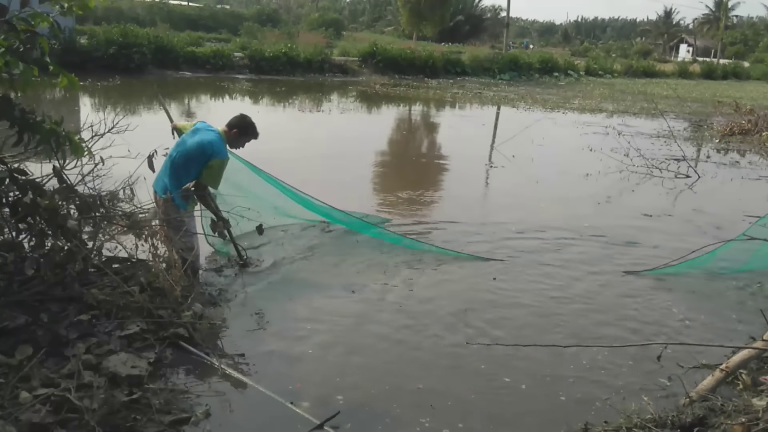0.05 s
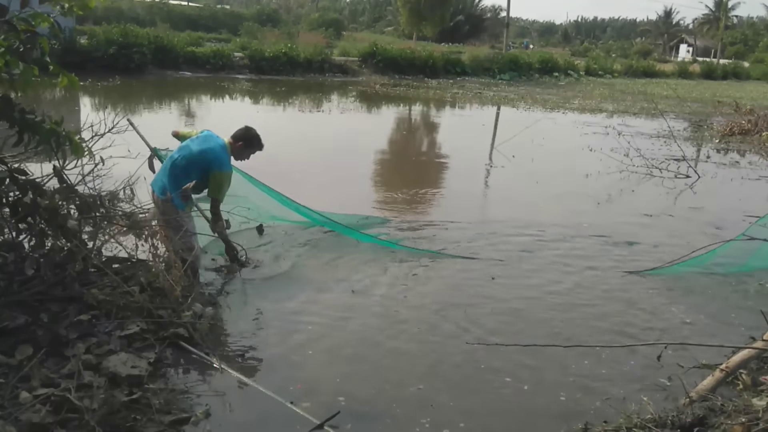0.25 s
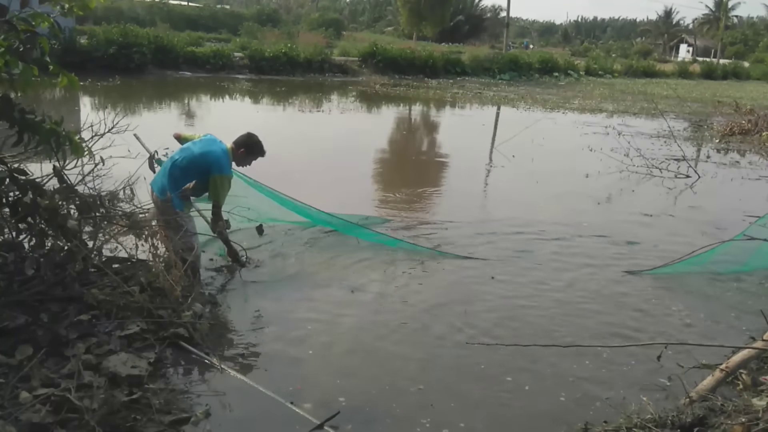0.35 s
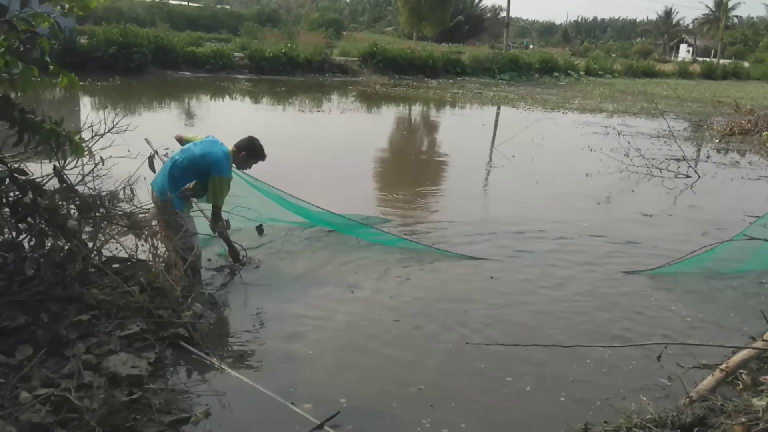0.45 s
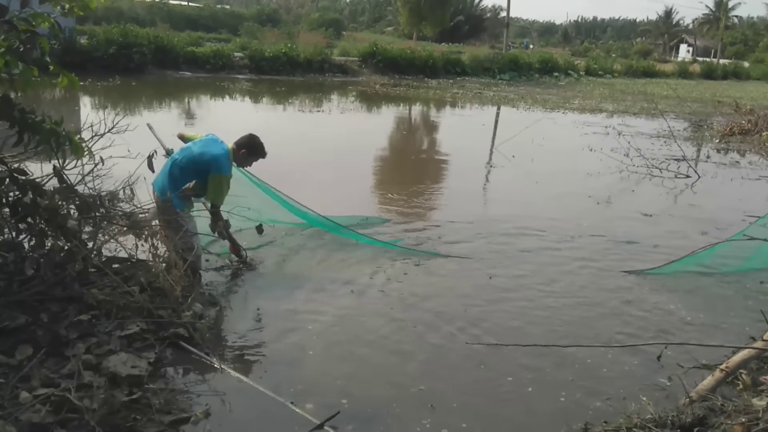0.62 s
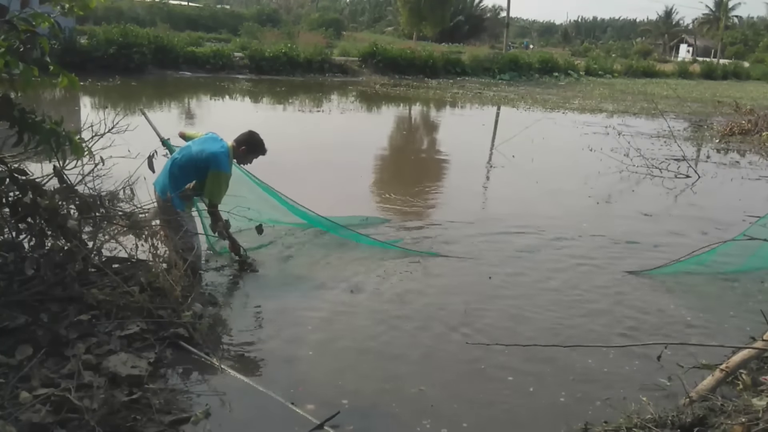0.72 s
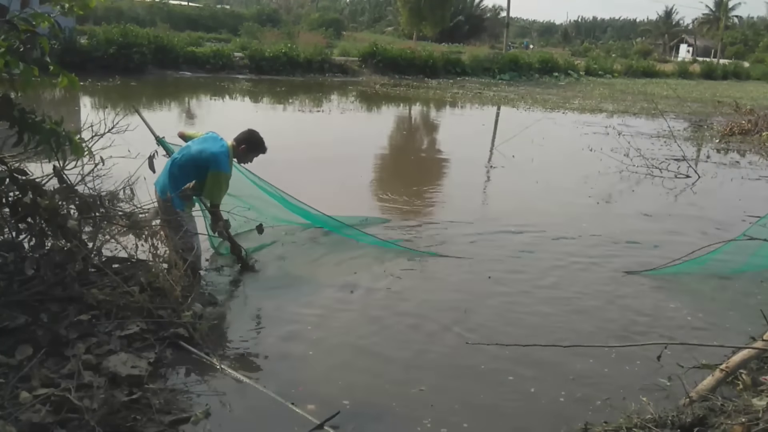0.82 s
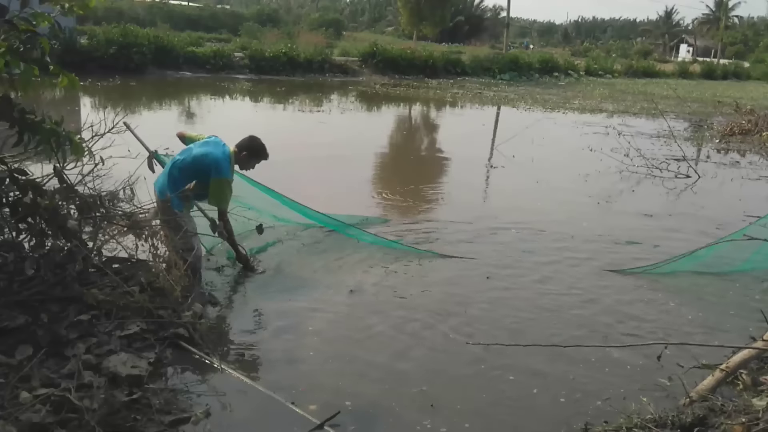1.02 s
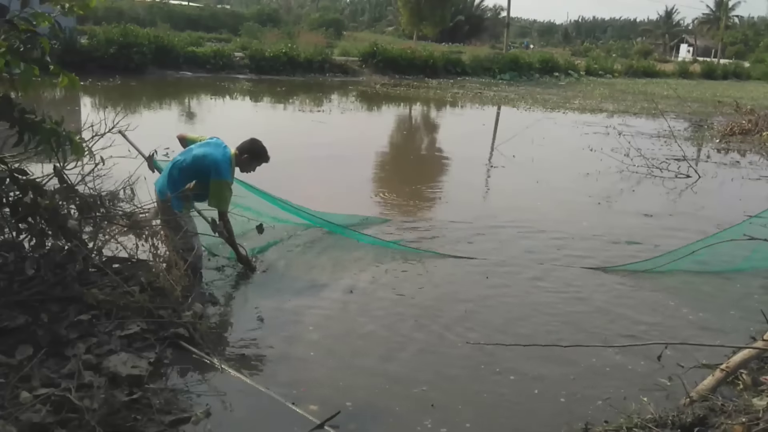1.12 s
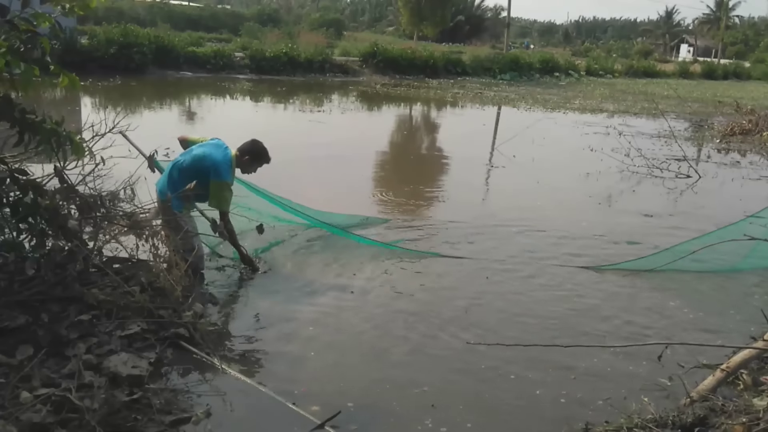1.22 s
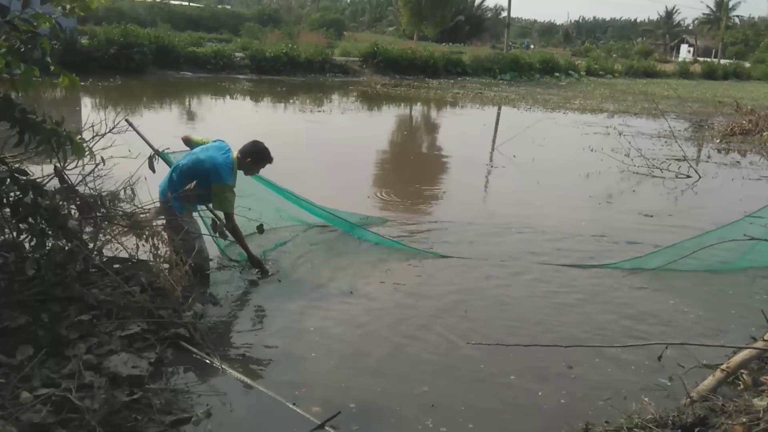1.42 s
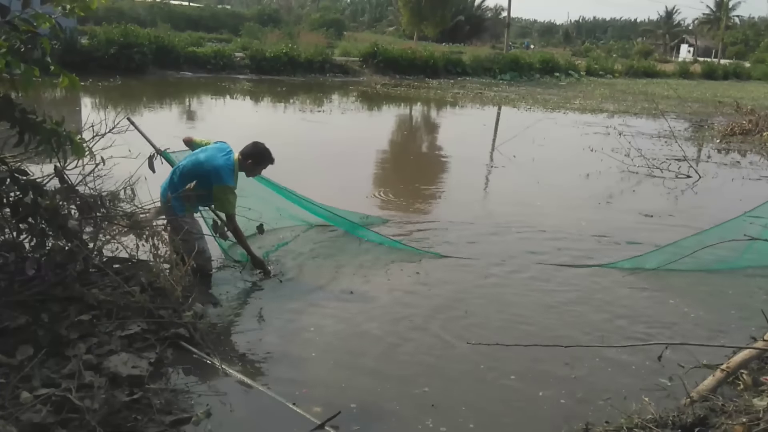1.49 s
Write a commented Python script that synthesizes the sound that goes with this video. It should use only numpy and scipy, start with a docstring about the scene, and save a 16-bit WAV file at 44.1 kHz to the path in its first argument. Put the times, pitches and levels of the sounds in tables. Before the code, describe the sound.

Water splashing as a fine-mesh net slaps a pond surface, then swishes through the shallows

```python
"""Net dragged through a pond

Someone works a fine-mesh net in the shallows. A sharp slap throws up spray, then the net is dragged in a
longer swish, and single drops snap over a quiet outdoor background. Streaming water and spray are filtered
noise crackles, slaps and drops are short decaying bursts, and bubbles are fading tones that rise in pitch.
"""
import sys
import numpy as np
from scipy import signal
from scipy.fft import rfft, irfft
from scipy.io import wavfile

SR = 44100
rng = np.random.default_rng(int(sys.argv[2]) if len(sys.argv) > 2 else 0)


def pcm_store(signal):
    """Save signal as 16-bit PCM."""
    levels = np.round(np.clip(np.atleast_2d(signal), -1, 1) * 32767)
    wavfile.write(sys.argv[1], SR, levels.astype(np.int16).T)


N = 68355
T = np.arange(N) / SR  # time of each sample, in seconds

# Quiet open air, tone colour: (frequency [Hz], relative level [dB])
AIR_COLOUR = [(18, -51), (30, 6), (124, -12.5), (300, -5), (801, -12.5), (1210, -9.5), (1930, -14),
              (2080, -10), (4770, -17.5), (13400, -19.5), (14500, -16)]
AIR_DB = -65
# Deep rumble, loudness over time: (time [s], level [dB])
RUMBLE_LEVEL = [(0, -88), (0.12, -70), (0.25, -61.5), (0.325, -60), (0.42, -68), (0.55, -73), (0.69, -68),
                (0.88, -61), (0.97, -65), (1.08, -63), (1.28, -70), (1.55, -78)]
# Deep rumble, tone colour: (frequency [Hz], relative level [dB])
RUMBLE_TONE = [(25, -4), (42, -12), (60, 4.5), (120, -5.5), (200, 2), (500, -54)]
# Water pushed about by the net: (time [s], level [dB])
SLOSH_LEVEL = [(0, -71.5), (0.16, -59.5), (0.3, -57.5), (0.43, -58.5), (0.55, -70.5), (0.65, -63.5),
               (0.71, -61.5), (0.77, -59.5), (0.88, -55.5), (1.15, -55), (1.33, -59), (1.55, -56.5)]
# Pushed water, tone colour: (frequency [Hz], relative level [dB])
SLOSH_TONE = [(50, -19), (100, -1), (250, -2.5), (450, -1.5), (800, -5), (1500, -8.5), (3000, -12.5),
              (6000, -46)]
# Gurgling bubbles: how many, how long they ring, level against the churn
GURGLES_PER_S, GURGLE_CYCLES, GURGLE_DB = 420, 4.4, -5.5
BUBBLE_RISE_PER_LIFE = 0.061  # share of the starting pitch

# Water streaming through the mesh in the first pull: (time [s], level before MESH_DB [dB])
FIRST_PULL_LEVEL = [(0.0, -74), (0.07, -73.5), (0.11, -58.5), (0.164, -50), (0.19, -48.5), (0.39, -55.5),
                    (0.43, -51), (0.48, -57.5), (0.53, -94), (0.6, -78)]
# Water streaming through the mesh in the second pull: (time [s], level before MESH_DB [dB])
SECOND_PULL_LEVEL = [(0.61, -78), (0.66, -59), (0.71, -54), (0.768, -51.5), (0.8, -43.5), (0.84, -41.5),
                     (0.99, -42), (1.04, -45), (1.18, -48.5), (1.275, -48.5), (1.31, -59.5), (1.55, -58.5)]
# Mesh water, tone colour: (frequency [Hz], relative level [dB])
MESH_COLOUR = [(500, -9.5), (1000, -11.5), (1800, -6), (2600, -4.5), (3800, -1.5), (5200, -3.5), (6500, -1),
               (8500, 1.5), (11000, -1), (14000, -7)]
MESH_DB, MESH_LOW_HZ, MESH_SCATTER_DB = 3.5, 910, 3.5
FIZZ_PER_S, FIZZ_CYCLES, FIZZ_DB = 900, 50, -11  # tiny bubbles in the mesh, level against the hiss
DROPLETS_PER_S, MIST_DB = 5100, 4  # mist level is set against the droplets

# Hollow body of a splash: (time [s], level [dB], decay time constant [s])
PLOP_HITS = [(0.2005, -45, 0.031), (1.4245, -58, .003), (1.432, -53.5, 0.02), (0.95, -64, .01)]
PLOP_HZ, PLOP_WIDTH_HZ = 1130, 800
# Spray thrown up or falling back: (start [s], level [dB], attack [s], hold [s], decay [dB per s])
SPRAY_BURSTS = [(0.201, -30, 0.0094, 0.042, 184), (0.268, -42.5, 0.032, 0.021, 114),
                (0.418, -50, 0.0047, 0.0033, 500), (1.198, -40.5, 0.01, 0.0048, 271),
                (1.252, -47.5, 0.011, 0.0029, 427), (1.429, -51, 0.0048, .004, 250)]
# Spray, tone colour: (frequency [Hz], relative level [dB])
SPRAY_COLOUR = [(500, -12), (1100, -11), (1750, -10), (2700, -1.5), (4000, 0.5), (5000, -2.5), (6400, 0),
                (8500, 1), (11000, -1.5), (14000, -8)]
SPRAY_SCATTER_DB = 3.5
# Slaps of the wet net on the water: (time [s], level [dB], decay time constant [s])
SLAP_HITS = [(0.2113, -22, .0005), (0.2125, -11.5, 0.001), (0.2142, -21, 0.0025), (0.2170, -17.5, 0.0018)]
# Slaps, tone colour: (frequency [Hz], relative level [dB])
SLAP_COLOUR = [(400, -19), (800, -20), (1500, -20), (2200, -9), (2900, 0.5), (3600, -16), (4400, -3.5),
               (5300, -2.5), (6300, 2), (7700, 6), (9200, -5), (10500, -8), (12200, -11), (13100, 0),
               (14500, -15)]
# Air pockets that ring after a slap: (pitch [Hz], level [dB], time to fall by 60 dB [s])
AIR_POCKETS = [(2750, -38, 0.086), (3010, -28.5, 0.083), (4570, -34, 0.089), (6140, -37, .08)]
# Single drops: (time [s], level [dB], decay time constant [s])
DRIP_HITS = [(0.4258, -30, 0.00066), (0.4965, -38, 0.0013), (0.619, -52, .001), (0.6235, -41, 0.0017),
             (0.629, -45, .002), (0.673, -51, .001)]
# Drops, tone colour: (frequency [Hz], relative level [dB])
DRIP_COLOUR = [(200, -18), (1200, -12), (3000, 4), (5000, -3), (7300, 11), (10000, 5), (14500, -6)]
# Single bubbles that stand out, low and high: (time [s], starting pitch [Hz], level [dB], decay time constant [s])
SINGLE_BUBBLES = [(0.695, 405, -52.5, 0.012), (0.718, 240, -53, 0.018), (0.966, 1595, -46, 0.008),
                  (1.229, 860, -51, .008), (1.262, 7820, -38, 0.0076), (1.4335, 1340, -47, .002)]
GLUG_RISE_PER_S = 2.7  # share of the starting pitch
# One sharp snap of the net: (time [s], level [dB], decay time constant [s])
SNAP_HIT = [(1.4249, -24.5, 0.0009)]
# Snap, tone colour: (frequency [Hz], relative level [dB])
SNAP_TONE = [(200, -9), (700, -14), (1250, -0.5), (2200, -7.5), (3700, -2.5), (5000, -11), (7000, 8.5),
             (8400, -4), (9500, 4), (11000, -5), (14500, -3)]
SPIKE_DB = 10  # first contact, over the crack that follows
BANK_DB, BANK_DECAY_S = -9.5, 0.013

# Two microphones: delay at the right one, then how much sound arrives scattered in bass and treble
RIGHT_LAG_S, DIFFUSE_HZ, BASS_SHARE, DIFFUSE_SHARE = 0.000062, 477, 0.076, 0.82
SPLASH_RIGHT_DB, SLOSH_RIGHT_DB = 2, 0.6  # right microphone over left
TOP_HZ = 14400


def undb(db):
    """Turn decibels into a plain multiplier."""
    return 10 ** (np.asarray(db) / 20)


def unit(x):
    """Scale to an average (rms) strength of 1."""
    return x / np.sqrt(np.mean(x ** 2))


def curve(rows):
    """Loudness that follows (s, dB) points, silent beyond 30 ms outside them."""
    s, db = np.array(rows).T
    active = (T >= s[0] - 0.03) * (T <= s[-1] + 0.03)
    return undb(np.interp(T, s, db)) * active


def colour(x, points):
    """Filter through (Hz, dB) points without sounding early, keeping the power of white noise."""
    hz, db = np.array(points).T
    size = 8192
    f = np.maximum(np.fft.rfftfreq(size, 1 / SR), 1)
    gain = undb(np.interp(np.log(f), np.log(hz), db))
    # Fold the cepstrum forward in time: a minimum-phase filter
    cepstrum = irfft(np.log(gain))
    cepstrum[1:size // 2] *= 2
    cepstrum[size // 2 + 1:] = 0
    response = irfft(np.exp(rfft(cepstrum)))
    response = response / np.linalg.norm(response)
    return signal.fftconvolve(x, response[None], axes=1)[:, :N]


def high_pass(x, hz):
    """Remove the lows."""
    return signal.sosfilt(signal.butter(2, hz, "high", fs=SR, output="sos"), x)


def ports(x, share):
    """Three like signals to two microphones: one direct, later at the right; two scattered, mostly treble."""
    f = np.fft.rfftfreq(N, 1 / SR)
    spectra = rfft(x)
    treble = f ** 2 / (f ** 2 + DIFFUSE_HZ ** 2)
    scattered = np.clip(BASS_SHARE + (share - BASS_SHARE) * treble, 0, 1)
    delay = np.exp(-2j * np.pi * f * RIGHT_LAG_S)
    direct = np.array([spectra[0], spectra[0] * delay])
    return irfft(np.sqrt(1 - scattered) * direct + np.sqrt(scattered) * spectra[1:], N)


def pan(x, right_db):
    """Make the right louder than the left by right_db."""
    return x * undb(np.array([[-right_db], [right_db]]) / 2)


def noise():
    """Steady noise at both microphones."""
    return ports(rng.standard_normal((3, N)), DIFFUSE_SHARE)


def droplets(scatter_db):
    """Thousands of tiny impacts of uneven size, each a very short crackle, over a fine mist."""
    landed = rng.random(N) < DROPLETS_PER_S / SR
    size = np.minimum(rng.exponential(size=N), 5)
    hits = landed * undb(scatter_db * size)
    # The power of each crackle dies away with a time constant of 0.25 ms
    power = signal.lfilter([1], [1, -np.exp(-1 / (SR * 0.00025))], hits ** 2)
    strength = np.sqrt(power / power.mean() + undb(MIST_DB) ** 2)
    return unit(ports(rng.standard_normal((3, N)) * strength, DIFFUSE_SHARE))


def bursts(rows, share):
    """Each impact is one pressure spike and a crack that dies away exponentially."""
    power, spikes = 0, np.zeros((3, N))
    for s, db, tau in rows:
        power = power + undb(db) ** 2 * (T >= s) * np.exp(-2 * np.abs(T - s) / tau)
        spikes[0, int(s * SR)] += undb(db + SPIKE_DB)
    cracks = np.sign(rng.standard_normal((3, N))) * np.sqrt(power)
    return ports(cracks + spikes, share)


def bubbles(per_s, low_hz, high_hz, cycles, scatter_db):
    """A cloud of bubbles of random pitch and strength that rise in pitch as they fade."""
    out = np.zeros(N)
    for when, pitch, size in rng.random((int(per_s * N / SR), 3)):
        hz = low_hz * (high_hz / low_hz) ** pitch
        start = int(when * N)
        life = cycles / hz
        age = T[:min(int(2 * life * SR), N - start)]
        level = undb(scatter_db * size ** 2) * np.exp(-2 * age / life)
        turns = hz * age * (1 + BUBBLE_RISE_PER_LIFE * age / life / 2)
        out[start:start + len(age)] += level * np.sin(2 * np.pi * turns)
    return unit(out)


def background():
    """Quiet open air as steady noise, and a low rumble as noise of uneven level."""
    air = unit(colour(noise(), AIR_COLOUR)) * undb(AIR_DB)
    rumble = unit(colour(noise(), RUMBLE_TONE)) * curve(RUMBLE_LEVEL)
    return air + rumble


def slosh():
    """Churning water is filtered noise, with gurgling bubbles mixed in."""
    gurgle = bubbles(GURGLES_PER_S, low_hz=231.4, high_hz=1505, cycles=GURGLE_CYCLES, scatter_db=10.5)
    churn = colour(noise(), SLOSH_TONE)
    return unit(churn + undb(GURGLE_DB) * gurgle) * curve(SLOSH_LEVEL)


def mesh():
    """Water hisses and fizzes through the net, with a level that follows the two pulls."""
    hiss = unit(high_pass(colour(droplets(MESH_SCATTER_DB), MESH_COLOUR), MESH_LOW_HZ))
    fizz = np.array([bubbles(FIZZ_PER_S, low_hz=2498, high_hz=11070, cycles=FIZZ_CYCLES, scatter_db=16)
                     for _ in range(2)])  # separate bubbles at each microphone
    pulls = curve(FIRST_PULL_LEVEL) + curve(SECOND_PULL_LEVEL)
    return (hiss + undb(FIZZ_DB) * fizz) * pulls * undb(MESH_DB)


def plops():
    """The hollow body of a splash: bursts through one broad resonance."""
    resonance = signal.iirpeak(PLOP_HZ, PLOP_HZ / PLOP_WIDTH_HZ, fs=SR)
    hollow = signal.lfilter(*resonance, bursts(PLOP_HITS, share=0.4))
    return hollow * np.sqrt(SR / np.pi / PLOP_WIDTH_HZ)  # make up for the power filtered away


def spray():
    """Thrown water swells quickly, holds and patters out."""
    level = 0
    for s, db, attack, hold, fall in SPRAY_BURSTS:
        swell = np.clip((T - s) / attack, 0, 1)
        fading = np.maximum(T - s - attack - hold, 0)
        level = level + swell * undb(db - fall * fading)
    return unit(high_pass(colour(droplets(SPRAY_SCATTER_DB), SPRAY_COLOUR), hz=900)) * level


def slaps():
    """The wet net hits the water in a cluster of sharp cracks."""
    return high_pass(colour(bursts(SLAP_HITS, share=0.34), SLAP_COLOUR), hz=500)


def air_pockets():
    """Air pockets ring as fading tones from the second slap on."""
    out = np.zeros((2, N))
    age = np.maximum(T - SLAP_HITS[1][0], 0)
    for hz, db, t60 in AIR_POCKETS:
        fade = (age > 0) * np.exp(-np.log(1000) * age / t60)
        phase = rng.random((2, 1))  # differs at each microphone
        out += undb(db) * fade * np.sin(2 * np.pi * (hz * age + phase))
    return out


def bank_scatter(x):
    """The bank scatters sound back as a brief tail of fading noise."""
    tail = rng.standard_normal((2, N)) * np.exp(-T / BANK_DECAY_S) * np.sqrt(2 / SR / BANK_DECAY_S)
    return undb(BANK_DB) * signal.fftconvolve(x, tail, axes=1)[:, :N]


def drips():
    """Single drops snap on the surface as very short cracks."""
    return colour(bursts(DRIP_HITS, share=0.62), DRIP_COLOUR)


def glugs():
    """Single bubbles, low and high, ring and rise in pitch as they fade."""
    out = np.zeros(N)
    for s, hz, db, tau in SINGLE_BUBBLES:
        age = np.maximum(T - s, 0)
        turns = hz * age * (1 + GLUG_RISE_PER_S * age / 2)
        out += undb(db) * np.exp(-age / tau) * np.sin(2 * np.pi * turns)
    return out


def snap():
    """The net snaps once in a sharp, brief crack."""
    return colour(bursts(SNAP_HIT, share=0.25), SNAP_TONE)


def impacts():
    """All short hits and ringing air pockets, with their scatter from the bank."""
    hits = slaps() + drips() + snap() + air_pockets() + plops()
    return hits + bank_scatter(hits)


def scene():
    """Splashes and pond, both slightly stronger on the right."""
    splashes = mesh() + spray() + impacts() + glugs()
    pond = slosh() + background()
    return pan(splashes, SPLASH_RIGHT_DB) + pan(pond, SLOSH_RIGHT_DB)


def record(dry):
    """Filter out the deep bass and everything above TOP_HZ."""
    no_bass = high_pass(high_pass(dry, 38), 38)
    return signal.sosfilt(signal.ellip(10, 0.2, 80, TOP_HZ, fs=SR, output="sos"), no_bass)


dry = scene()
out = record(dry)
pcm_store(out)
```